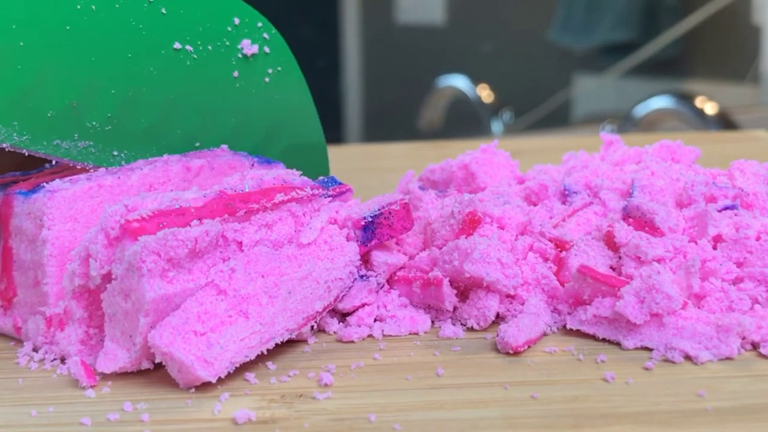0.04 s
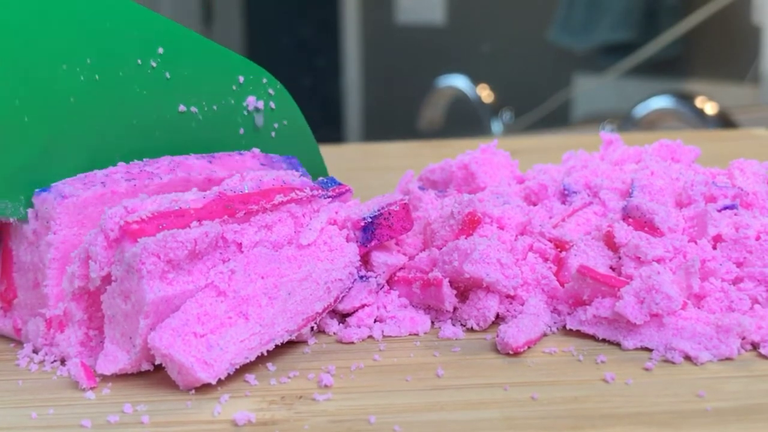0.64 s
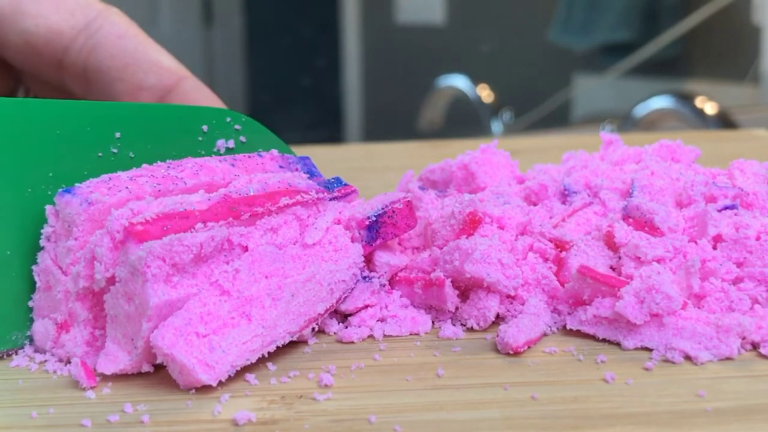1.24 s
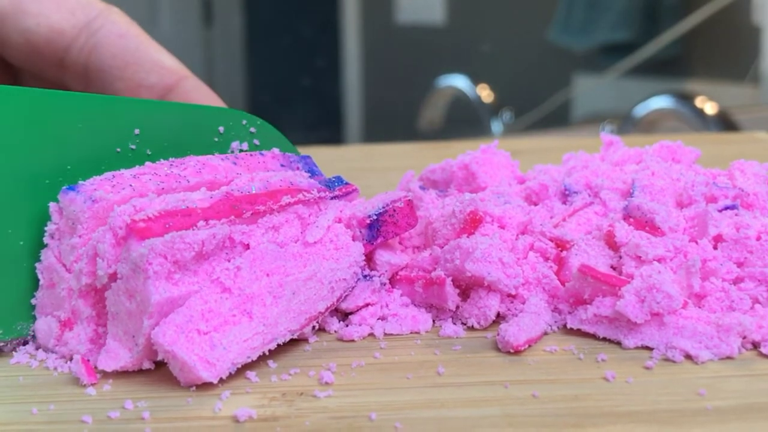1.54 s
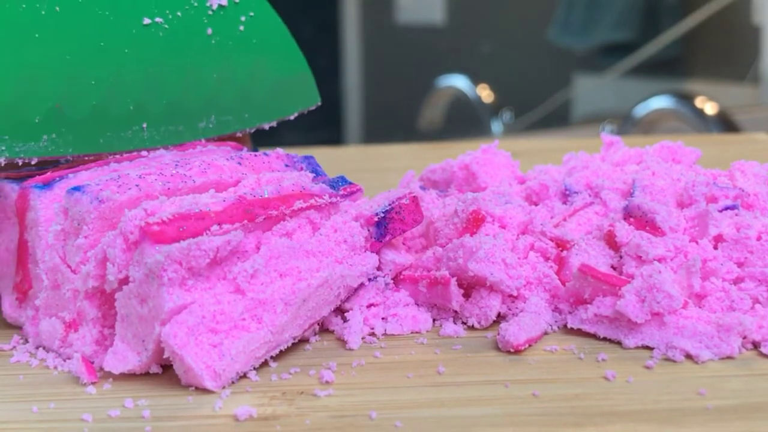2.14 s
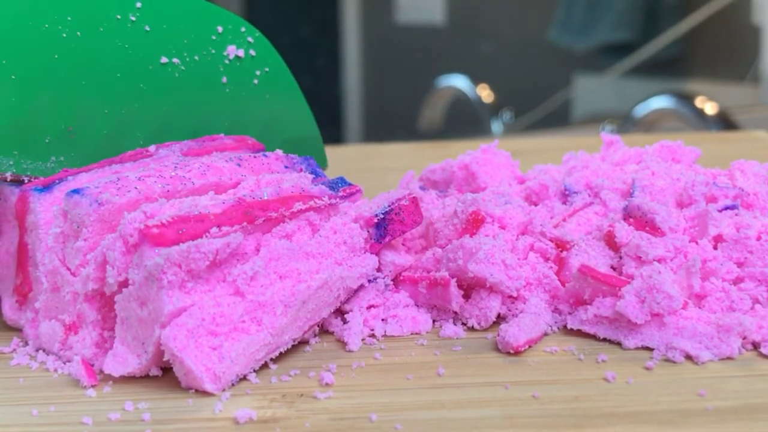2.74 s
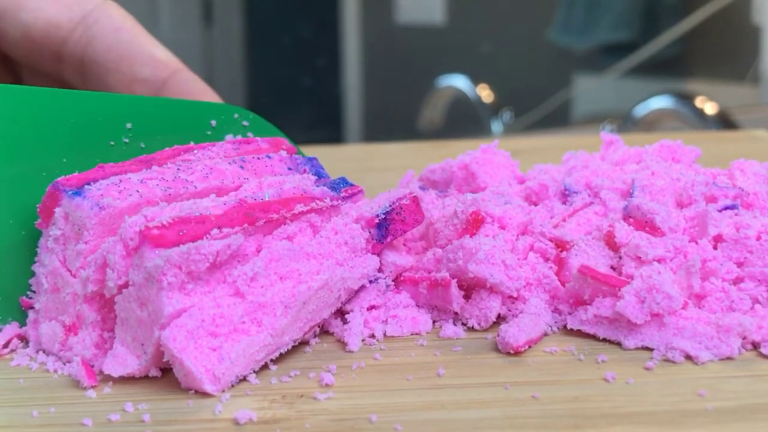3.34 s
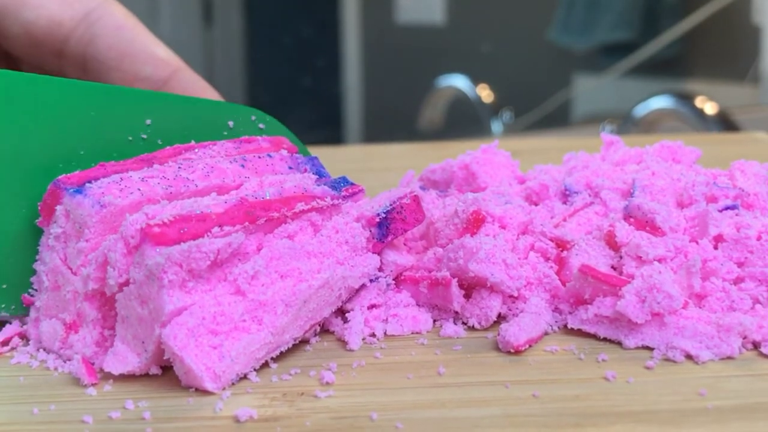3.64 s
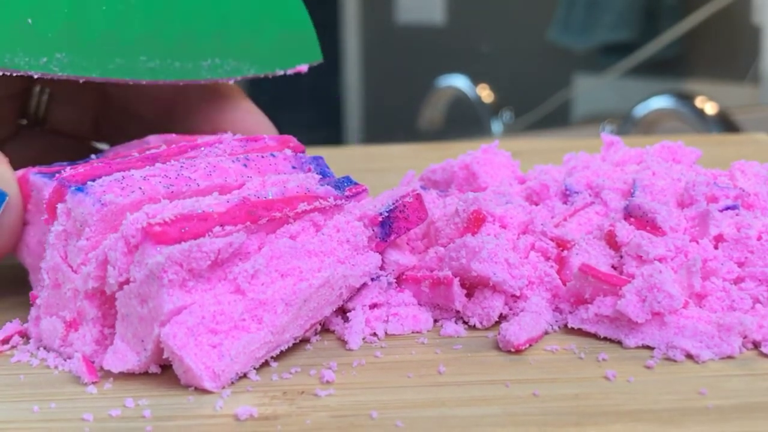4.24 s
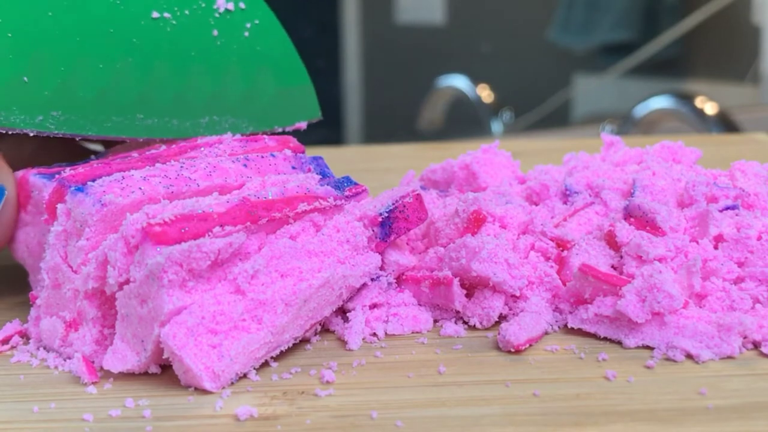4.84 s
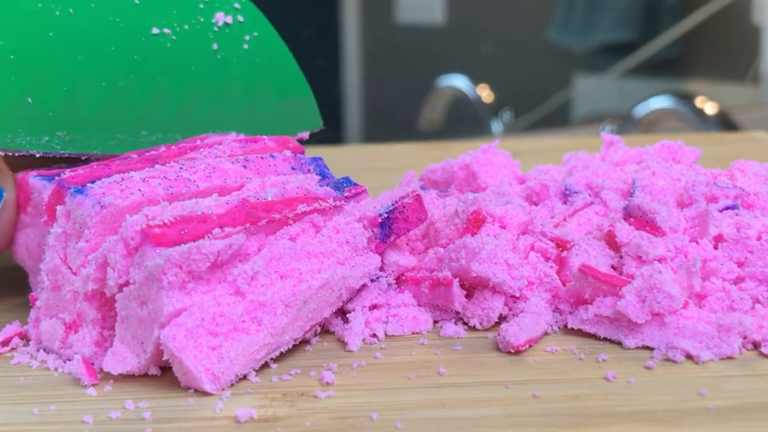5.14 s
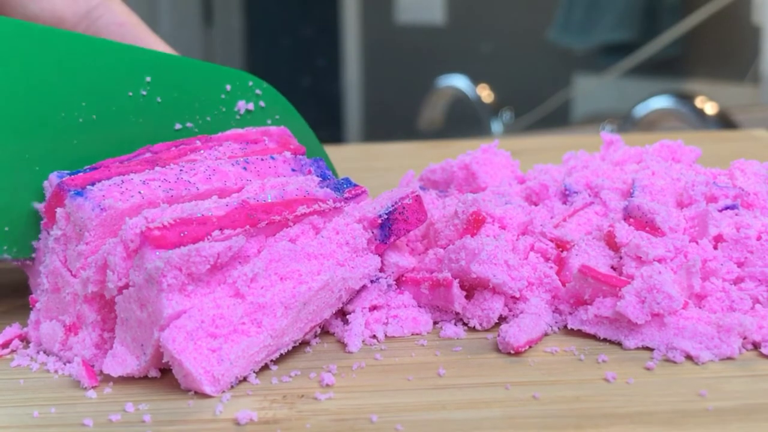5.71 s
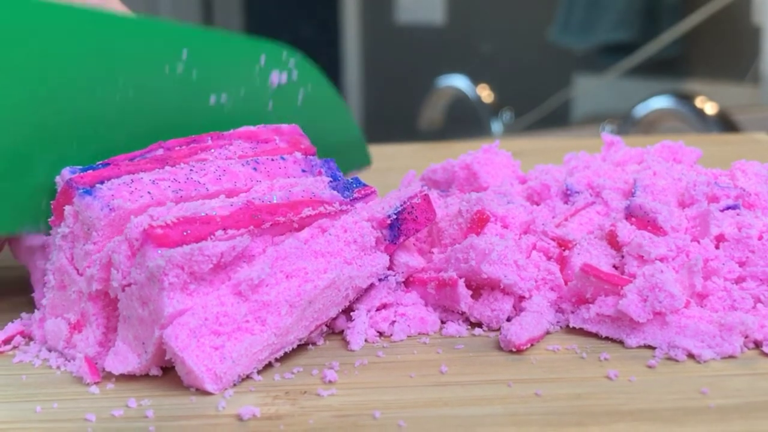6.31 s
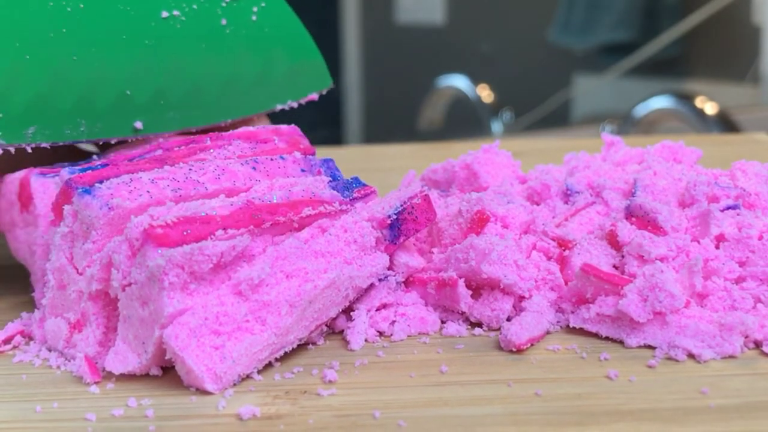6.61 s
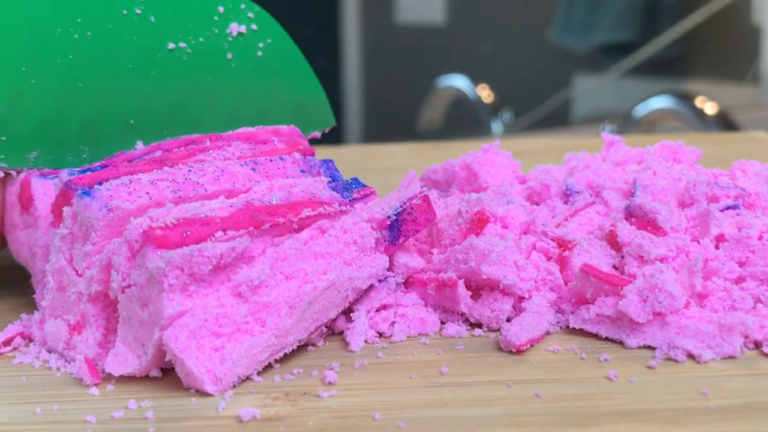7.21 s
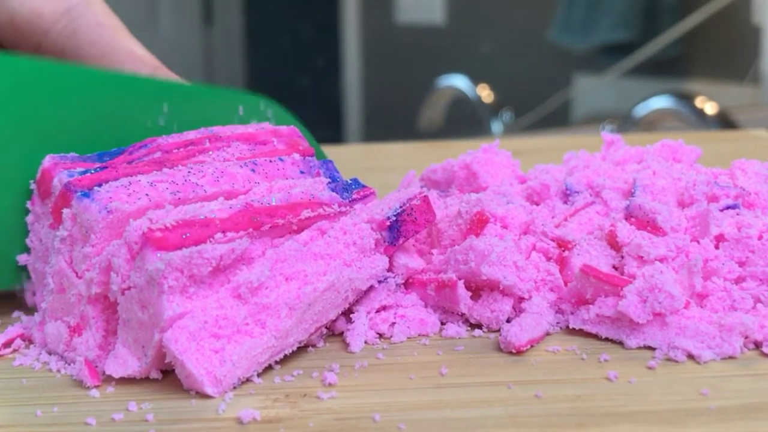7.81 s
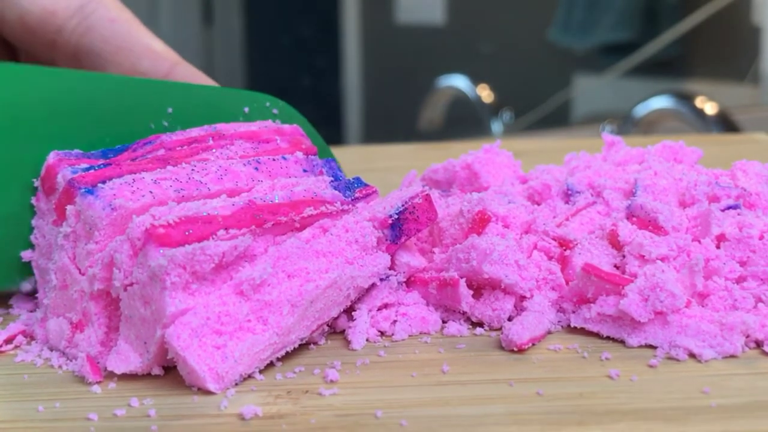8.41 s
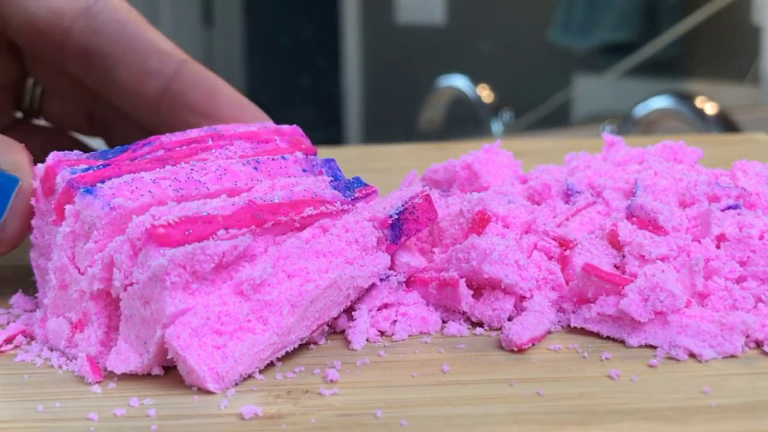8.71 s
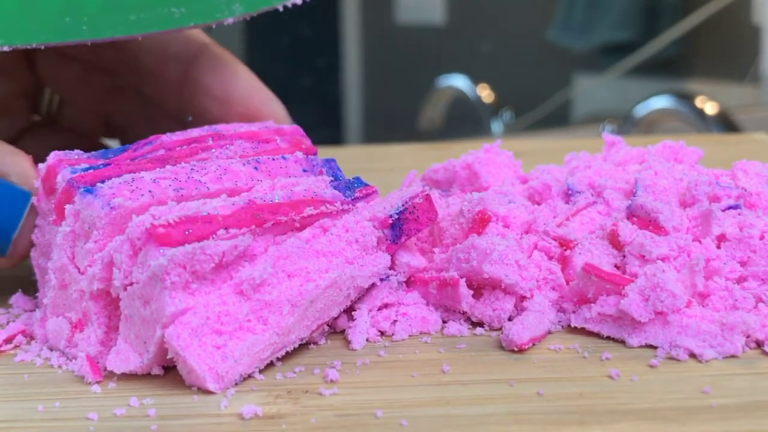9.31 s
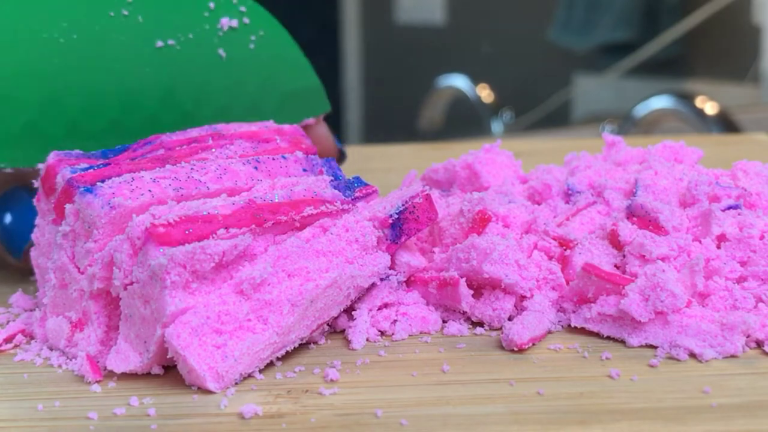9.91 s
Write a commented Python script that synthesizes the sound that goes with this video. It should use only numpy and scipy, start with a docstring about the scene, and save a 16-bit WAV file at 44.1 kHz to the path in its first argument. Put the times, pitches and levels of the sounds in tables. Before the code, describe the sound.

Four slow cuts crunch through a crumbly bath bar, each ending with the blade knocking on wood, in a quietly humming kitchen.

```python
"""A kitchen, one microphone close to a wooden board, over ventilation rumble, a low hum and a thin whine.
From the first moment a knife drags through a soft, crumbly bubble bar, short pushes crushing tiny grains.
Specks come loose, crumbs snap and drop, and late in the cut the blade knocks on the board.
Three more cuts follow, about 2.5 s apart; the third lands hardest. The room rings briefly behind each.
After the fourth come a slight crunch, a last crumb and a faint, high rustle of fingers."""
import sys
import numpy as np
from scipy import signal
from scipy.io import wavfile

SR = 44100
rng = np.random.default_rng(int(sys.argv[2]) if len(sys.argv) > 2 else 0)


def store_pcm(level_fs):
    """Save levels as 16-bit WAV."""
    pcm = np.round(np.clip(level_fs, -1, 1) * 32767).astype(np.int16)
    wavfile.write(sys.argv[1], SR, np.atleast_2d(pcm).T)


N = 438794
TIME = np.arange(N) / SR
CUTOFF_HZ = 15850


def from_db(db):
    """Decibels to gain."""
    return 10 ** (np.asarray(db) / 20)


def rms_one(x):
    """Scale to rms 1."""
    return x / np.sqrt(np.mean(x ** 2) + 1e-20)


def at_hz(points, hz):
    """Read a table on a log-frequency axis."""
    freqs, values = np.array(points).T
    return np.interp(np.log(hz), np.log(freqs), values)


def add(out, s, sound):
    """Mix a sound in at s seconds."""
    start = max(round(s * SR), 0)
    out[start:start + len(sound)] += sound[:N - start]


def drift(per_s):
    """Smooth random wander, rms 1."""
    knots = rng.standard_normal(4096)
    return rms_one(np.interp(TIME * per_s, np.arange(len(knots)), knots))


def butter(x, order, hz, kind):
    """Butterworth filter."""
    return signal.sosfilt(signal.butter(order, hz, kind, fs=SR, output="sos"), x)


def resonate(x, hz, width_hz):
    """Two-pole resonance with gain 1 at its peak."""
    r = np.exp(-np.pi * width_hz / SR)
    feedback = [1, -2 * r * np.cos(2 * np.pi * hz / SR), r * r]
    return signal.lfilter(np.array([1, 0, -1]) * (1 - r * r) / 2, feedback, x + 1e-18)


def noise_bands(length):
    """Third-octave bands of noise as (centre Hz, samples); neighbours are unrelated."""
    edges = 22 * 2 ** (np.arange(30) / 3)
    white = rng.standard_normal((2, length + SR // 4))
    for k, (low, high) in enumerate(zip(edges, edges[1:])):
        yield np.sqrt(low * high), butter(white[k % 2], 2, [low, high], "band")[-length:]


# Ventilation, all round the microphone. Each row: frequency in Hz, relative density in dB.
VENTILATION = [(25, -20.5), (40, -9.5), (58, 2.5), (90, -9.5), (150, 0.5), (330, -1.5), (480, -11.5),
               (650, -9), (1000, -16.5), (2000, -26), (4000, -30), (8000, -36), (16000, -35)]
# The electrical whine, far in the background. Each row: frequency in Hz, rms level of overtones in dB.
WHINE_LEVELS = [(1000, -92), (2000, -91), (3000, -100), (4000, -90.5), (5000, -95), (6000, -91.5),
                (9000, -95.5), (15000, -100)]


def room_tone(air_db=-60, hum_hz=149, hum_db=-70, waver_db=0.8, whine_hz=998.5):
    """Ventilation rumble, a wavering hum and a thin electrical whine."""
    air = rms_one(sum(from_db(at_hz(VENTILATION, hz)) * band for hz, band in noise_bands(N)))
    hum = resonate(rng.standard_normal(N), hum_hz, width_hz=8)
    hum = rms_one(hum * from_db(waver_db * drift(2.4)))
    whine = 0
    for hz in np.arange(whine_hz, CUTOFF_HZ, whine_hz):
        amplitude = np.sqrt(2) * from_db(at_hz(WHINE_LEVELS, hz))
        whine += amplitude * np.sin(2 * np.pi * (hz * TIME + rng.random()))
    return from_db(air_db) * air + from_db(hum_db) * hum + whine


def force_curve(age, rise_s, hold_s, sag_db_per_s, rise_db=20, release_db_per_s=379.5):
    """The force swells to 1 at age 0, sags while it is held, then lets go."""
    early, late = np.maximum(-age, 0), np.maximum(age - hold_s, 0)
    db = -rise_db * early / rise_s - sag_db_per_s * np.maximum(age, 0) - release_db_per_s * late
    return from_db(np.maximum(db, -200))


# The bar drags on the sides of the blade, close to the microphone.
# Each row: start in seconds, length in seconds, level in dB.
CUT_DRAGS = [(0.0, 1.07, -75.5), (2.605, 0.95, -73), (5.212, 0.88, -67), (7.156, 0.91, -70)]
# The bar crunches under each push; the last row is a faint, high rustle of fingers.
# Each row: time of full force, rise and hold in seconds, level in dB, treble against body in dB.
PUSHES_AND_RUSTLE = [(0.015, 0.06, 0.099, -64, -7.5), (0.09, 0.079, 0.028, -61, -8),
                     (0.306, 0.053, 0.12, -69, -8), (0.61, 0.19, 0.044, -62, -10),
                     (0.699, 0.04, 0.051, -51, -5.5), (0.84, 0.08, 0.018, -56.5, -5),
                     (0.9, 0.08, 0.25, -59, -6.5), (2.538, 0.047, 0.03, -74, -14),
                     (2.625, 0.032, 0.028, -54.5, -7), (2.73, 0.063, 0.024, -59, -11),
                     (2.877, 0.05, 0.032, -75, -10), (3.026, 0.062, 0.026, -49.5, -8),
                     (3.183, 0.06, 0.031, -50.5, -7), (3.224, 0.04, 0.056, -50, -6.5),
                     (3.74, 0.12, 0.18, -70, -11), (4.001, 0.0597, 0.01, -74.5, -2),
                     (4.26, 0.066, 0.005, -72, -9), (5.117, 0.05, 0.005, -67, -14),
                     (5.214, 0.028, 0.0092, -60.5, -9), (5.29, 0.065, 0.043, -57.5, -9.5),
                     (5.38, 0.08, 0.03, -65, -18), (5.585, 0.051, 0.045, -49.5, -9),
                     (5.68, 0.04, 0.019, -54.5, -11), (5.769, 0.05, 0.11, -58, -10.5),
                     (5.9, 0.03, 0.0019, -45, -3.5), (7.02, 0.05, 0.02, -73.5, -15),
                     (7.205, 0.095, 0.014, -57.5, -13), (7.32, 0.05, 0.005, -70, -20),
                     (7.443, 0.093, 0.044, -54, -12), (7.7, 0.037, 0.015, -52, -9.5),
                     (7.735, 0.05, 0.0202, -54.5, -9.5), (7.874, 0.024, 0.031, -47, -7.5),
                     (8.42, 0.04, 0.011, -71.5, -10), (8.526, 0.06, 0.005, -68, 2.5),
                     (9.678, 0.3, 0.12, -85, 4.5)]


def effort(drag_rise_s=0.05, drag_treble_db=-11, sizzle_power=1.3):
    """Pushes, the rustle and the steady drag of each cut add up to a level and its treble share in dB."""
    t = TIME[::20]
    moves = [(force_curve(t - s, rise_s, hold_s, sag_db_per_s=30), db, treble_db)
             for s, rise_s, hold_s, db, treble_db in PUSHES_AND_RUSTLE]
    moves += [(force_curve(t - s, drag_rise_s, length_s, sag_db_per_s=0), db, drag_treble_db)
              for s, length_s, db in CUT_DRAGS]
    body = sum((from_db(db) * force) ** 2 for force, db, _ in moves)
    # the treble grows faster than the force, so it comes late and goes early
    top = sum((from_db(db + treble_db) * force ** sizzle_power) ** 2 for force, db, treble_db in moves)
    return np.interp(TIME, t, np.sqrt(body)), np.interp(TIME, t, 10 * np.log10(top / body))


def grain_ring(clicks, resonances, low_hz, high_hz):
    """Every grain strikes every resonance with a strength of its own; rms 1."""
    rings = 0
    for hz, width_hz, db in resonances:
        struck = clicks * rng.standard_normal(len(clicks))
        # two passes keep the valleys between resonances dark
        rings += from_db(db) * resonate(resonate(struck, hz, width_hz), hz, width_hz)
    return rms_one(butter(rings, 2, [low_hz, high_hz], "band"))


# Resonances of breaking grains, heard from close by: the body, then the sizzle.
# Each row: centre in Hz, width in Hz, relative level in dB.
BODY_RESONANCES = [(880, 560, -3.5), (1631, 370, 3.5), (2050, 730, -2.5), (2780, 680, -3),
                   (3867, 1100, -5.5), (4877, 1300, -10.5)]
SIZZLE_RESONANCES = [(6400, 1700, 2), (9100, 2100, 0), (12000, 2000, 0), (14300, 3100, -4)]


def fracture(clicks, treble_db, low_hz):
    """Breaking grains: a body from blade and board, and a fine sizzle above it."""
    body = grain_ring(clicks, BODY_RESONANCES, low_hz=low_hz, high_hz=6040)
    sizzle = grain_ring(clicks, SIZZLE_RESONANCES, low_hz=5000, high_hz=19000)
    return body + from_db(treble_db) * sizzle


# The counter under the board, shaken by each push and thumped by each landing.
# Each row: frequency in Hz, relative level in a thump in dB, seconds to fall 60 dB.
COUNTER_MODES = [(58.7, -4, .7), (73.6, -3, 0.58), (98, 2, .3), (299, 16.5, 0.033)]


def counter_rumble():
    """The uneven push shakes the counter; modes that ring longer are driven harder."""
    push = rng.standard_normal(N)
    return rms_one(sum(resonate(push, hz, width_hz=25) * t60 for hz, _, t60 in COUNTER_MODES))


def crunch(peak_grains_per_s=7000, spread_db=2.0, clump_db=1.2, rumble_db=-12.5):
    """The blade crushes grains in clumps, more the harder it pushes; like clicks make the rustle."""
    level, treble_db = effort()
    chance = np.clip(peak_grains_per_s / SR * np.sqrt(level / level.max()), 1e-3, 1)
    sizes = from_db(spread_db * np.minimum(rng.exponential(1, N), 5) + clump_db * drift(140))
    clicks = (rng.random(N) < chance) * sizes / np.sqrt(chance)  # same power at any grain rate
    rumble = from_db(rumble_db) * counter_rumble()
    return level * (fracture(clicks, treble_db, low_hz=600) + rumble)


def loose_specks(per_s=9, peak_db=-55, spread_db=4.0, settle_s=0.5):
    """Specks come loose at random during each cut and for a moment after it."""
    busy = sum((TIME > s) & (TIME < s + length_s + settle_s) for s, length_s, _ in CUT_DRAGS)
    sizes = from_db(spread_db * np.minimum(rng.exponential(1, N), 3))
    clicks = (rng.random(N) < busy * per_s / SR) * sizes
    ticks = fracture(clicks, treble_db=-6, low_hz=1500)
    return from_db(peak_db) * ticks / np.abs(ticks).max()


# Crumbs snap or drop on the board, just in front of the microphone. Each row: time in seconds,
# peak in dB, treble against body in dB before the lift, seconds for the trickle to fall 20 dB.
CRUMB_SNAPS = [(0.9037, -30.5, -2.5, 0.013), (0.967, -40.5, 7, 0.012), (0.99, -42.5, 2, 0.007),
               (1.1889, -42.5, -11, 0.018), (1.2091, -42.5, -9, 0.015), (1.654, -51, -2, 0.044),
               (1.6805, -50, -3, 0.02), (2.1206, -53, -5, 0.034), (2.157, -52, -6, 0.054),
               (3.0212, -35.5, -9, 0.022), (3.2366, -36.5, -3, 0.014), (3.292, -34, -5, 0.006),
               (3.462, -42, -15, 0.028), (3.4734, -32, -4.5, 0.0063), (3.7247, -54.5, -9, 0.014),
               (3.8042, -46, -17, 0.01), (4.026, -52.5, -6, 0.02), (4.6544, -51, 0, 0.026),
               (5.5525, -52.5, -10, 0.016), (5.9029, -36.5, -1, 0.014), (6.269, -50, -14, 0.007),
               (6.342, -53, -5, 0.031), (6.3895, -53.5, -7, 0.05), (7.489, -41, -9, 0.012),
               (7.9096, -25.5, -16, 0.0094), (7.9176, -33, -12, 0.008), (8.560, -50.5, -5, 0.017)]


def crumb_snaps(treble_lift_db=1.5, snap_s=0.00056, rubble_db=-5, lead_share=0.25):
    """A crumb starts to crack, gives way with one snap and ends in a trickle of smaller breaks."""
    out = np.zeros(N)
    t = TIME[:SR // 8] - TIME[SR // 40]  # 0 at the snap
    snap = (t >= 0) * np.exp(-np.abs(t) / snap_s)
    for s, peak_db, treble_db, crumble_s in CRUMB_SNAPS:
        from_snap = np.maximum(t, -t / lead_share) / crumble_s
        rubble = (rng.random(len(t)) < .2) * from_db(rubble_db - 20 * from_snap)
        # a light crumb barely moves the board, so it sounds thin
        crumb = fracture(snap + rubble, treble_db + treble_lift_db, low_hz=1900)
        add(out, s + t[0], from_db(peak_db) * crumb / np.abs(crumb).max())
    return out


# The wooden board with the blade on it. Each row: frequency in Hz at pitch ratio 1,
# relative level in dB, seconds to fall 60 dB.
BOARD_MODES = [(689.6, -7.5, .045), (802.5, 6, 0.015), (899, 4, 0.019), (1080, -8, 0.0288), (1706, 0, .02),
               (1857, -6, 0.028), (1950, 8, 0.011), (2173, -2, 0.021), (2680, -9.5, 0.031),
               (3450, -6.5, 0.009), (4160, -6.5, 0.01), (4850, -6, .012)]
# The blade lands, close to the microphone. Each row: start in seconds, peak of the knock in dB,
# contact cut-off in Hz, pitch ratio of the board, gain of the counter thump in dB.
BLADE_LANDINGS = [(0.9066, -33, 1300, 0.946, -60.5), (3.2933, -28, 1600, 0.952, -56.5),
                  (5.9032, -9, 3700, 0.99, -51), (7.9096, -13.5, 2450, 0.97, -55)]


def board_knocks(travel_s=0.00028, vary_db=0.42, radiation_hz=610):
    """The edge meets the wood: the board knocks and the counter thumps under it."""
    out, t = np.zeros(N), TIME[:SR]
    lowest_hz = BOARD_MODES[0][0]
    thump = sum(from_db(db - 60 * t / t60) * np.sin(2 * np.pi * hz * t) for hz, db, t60 in COUNTER_MODES)
    for s, peak_db, contact_hz, pitch, thump_db in BLADE_LANDINGS:
        knock = 0
        for hz, db, t60 in BOARD_MODES:
            # bending waves carry the high modes ahead of the low ones
            age = np.maximum(t - travel_s * np.sqrt(lowest_hz / hz), 0)
            strength = from_db(db - vary_db * rng.standard_normal()) / np.sqrt(1 + (hz / contact_hz) ** 4)
            swell = 1 - np.exp(-age * hz)  # over about one cycle
            knock += strength * swell * np.sin(2 * np.pi * pitch * hz * age) * from_db(-60 * age / t60)
        # a small board radiates hardly any bass
        knock = butter(knock, 8, radiation_hz * pitch, "high")
        add(out, s, from_db(peak_db) * knock / np.abs(knock).max() + from_db(thump_db) * thump)
    return out


# The kitchen walls, farther off. Each row: frequency in Hz, relative level of the tail in dB.
KITCHEN_COLOUR = [(60, 3.5), (340, 3.5), (500, 2), (700, -3.5), (1050, 2), (1700, -5.5), (2400, -3.5),
                  (3100, -2.5), (4300, 1), (5700, 1.5), (16000, -6)]
# How long they ring. Each row: frequency in Hz, seconds to fall 60 dB.
KITCHEN_DECAY = [(60, 0.65), (800, 0.71), (1500, 0.69), (2400, 0.58), (5000, 0.27), (16000, .22)]


def kitchen_ring(x, wet_db=-4.5, build_s=0.0027):
    """A diffuse tail that builds up over the first reflections and dies sooner in the treble."""
    t = TIME[:SR]
    tail = sum(band * from_db(at_hz(KITCHEN_COLOUR, hz) - 60 * t / at_hz(KITCHEN_DECAY, hz))
               for hz, band in noise_bands(len(t)))
    build = 1 - np.exp(-(t / build_s) ** 2)
    return from_db(wet_db) * signal.fftconvolve(x, tail * build / np.sqrt(SR / 20))[:N]


def scene():
    """Cutting close to one microphone, with the kitchen behind it."""
    cutting = crunch() + crumb_snaps() + loose_specks() + board_knocks()
    return (cutting + kitchen_ring(cutting) + room_tone())[None]


def record(dry, bass_hz=34):
    """The deepest bass is rolled off; the top is cut steeply."""
    thin = butter(dry, 3, bass_hz, "high")
    return signal.sosfilt(signal.ellip(12, .1, 80, CUTOFF_HZ, fs=SR, output="sos"), thin)


dry = scene()
out = record(dry)
store_pcm(out)
```